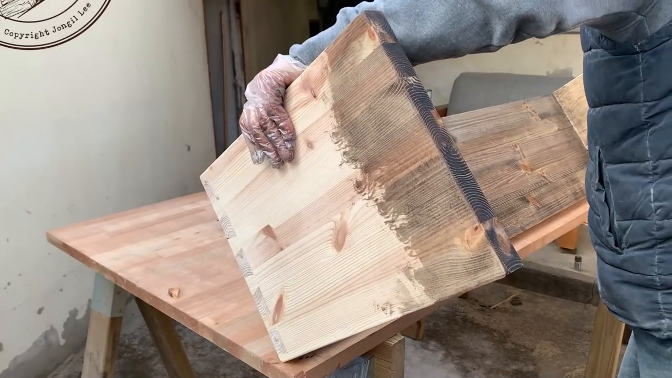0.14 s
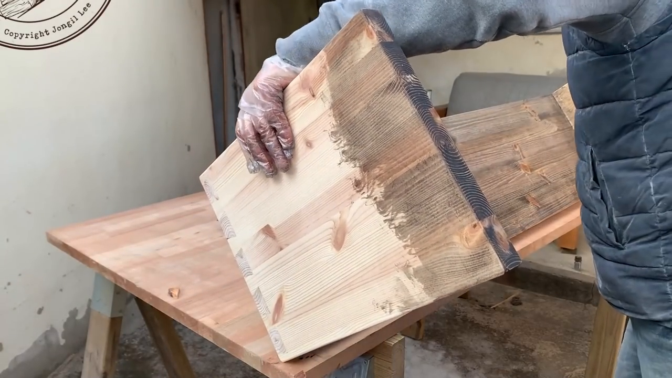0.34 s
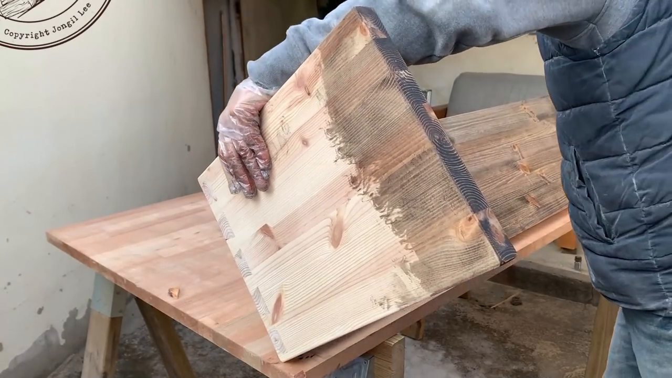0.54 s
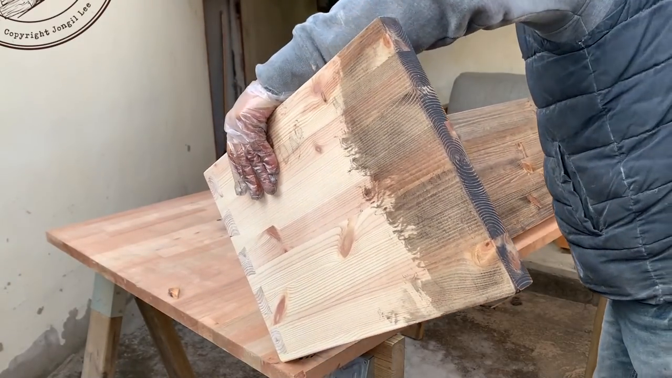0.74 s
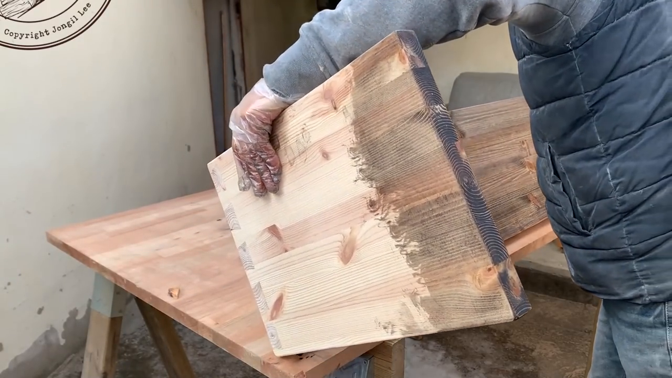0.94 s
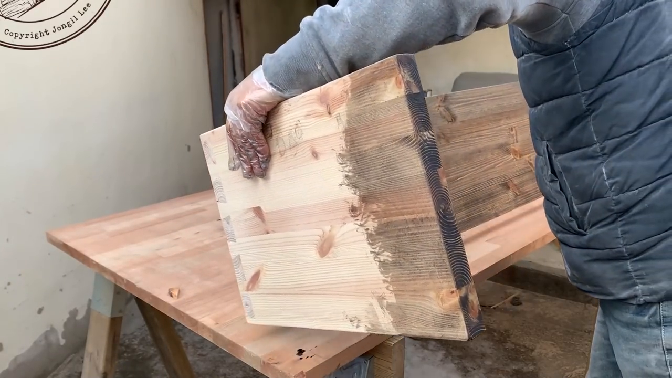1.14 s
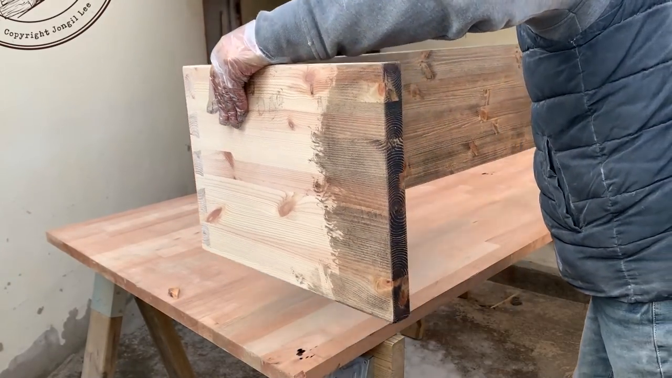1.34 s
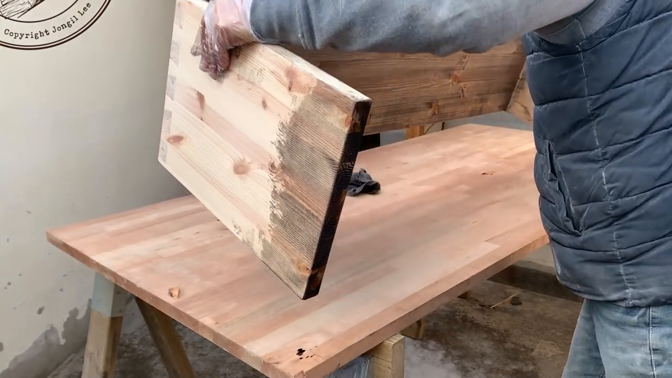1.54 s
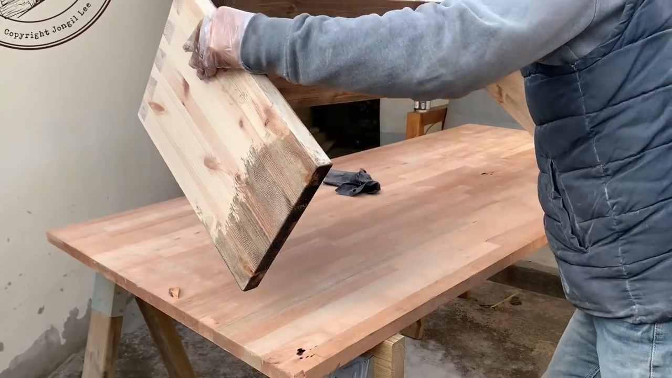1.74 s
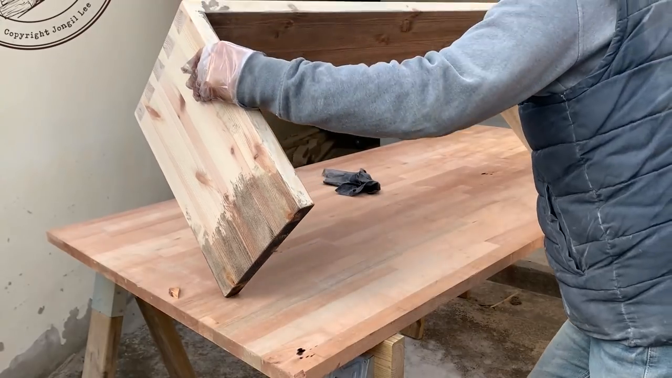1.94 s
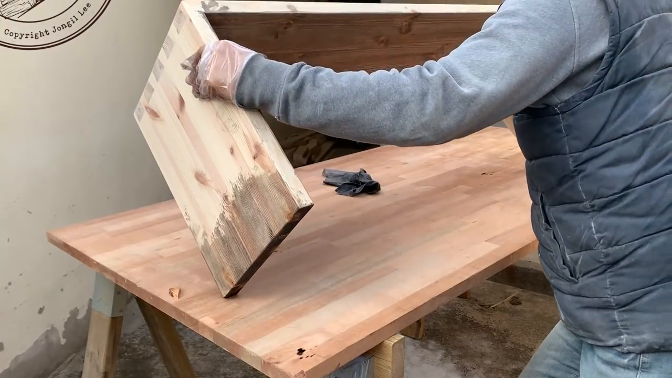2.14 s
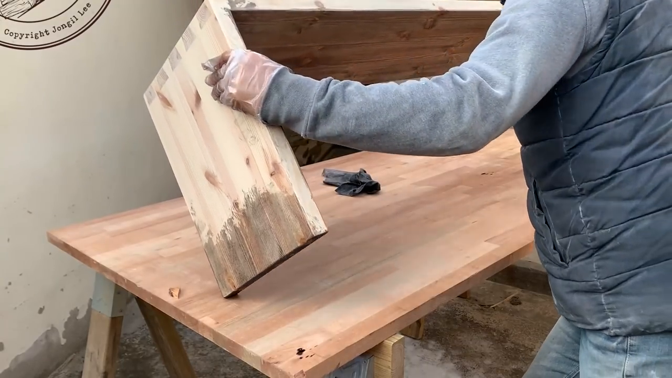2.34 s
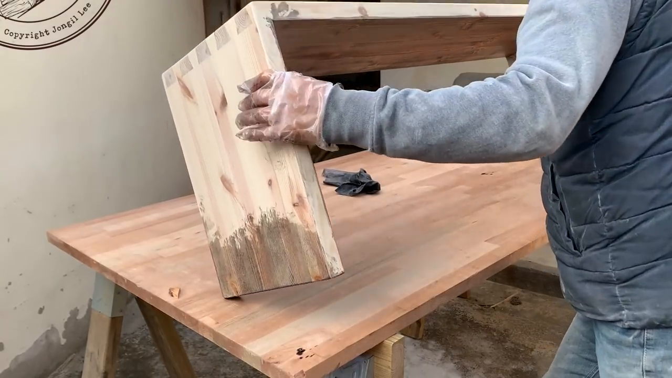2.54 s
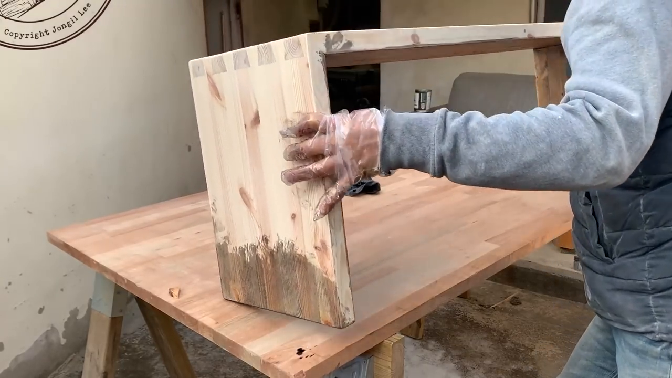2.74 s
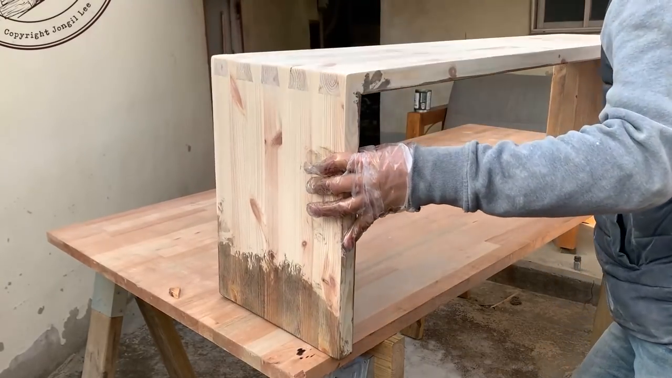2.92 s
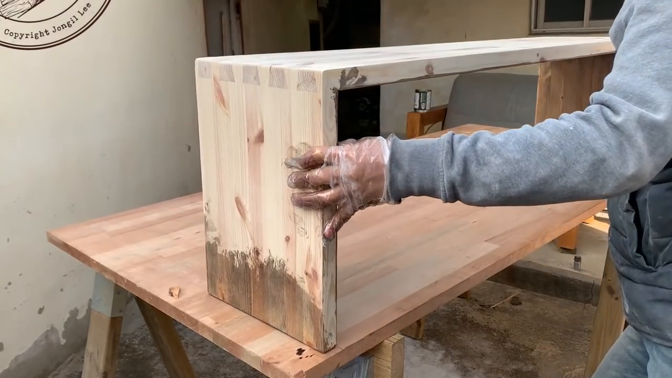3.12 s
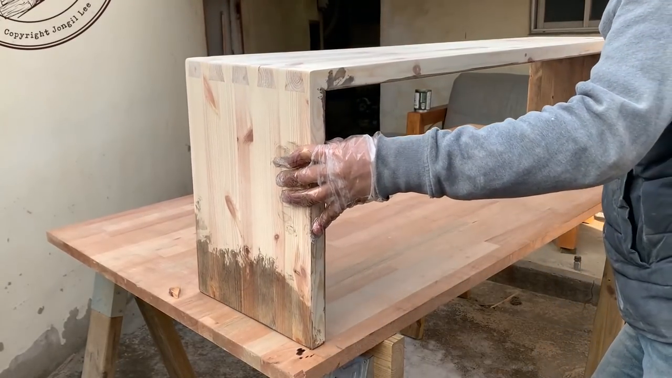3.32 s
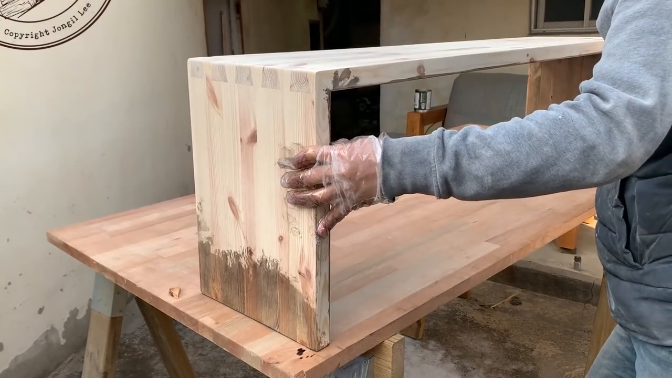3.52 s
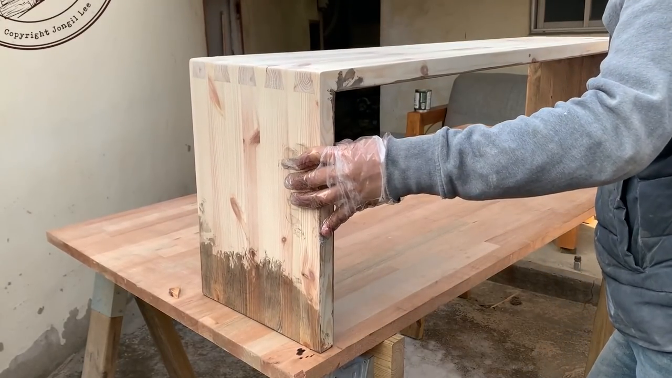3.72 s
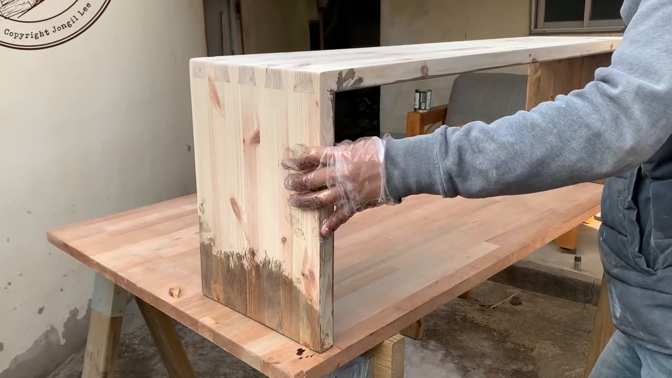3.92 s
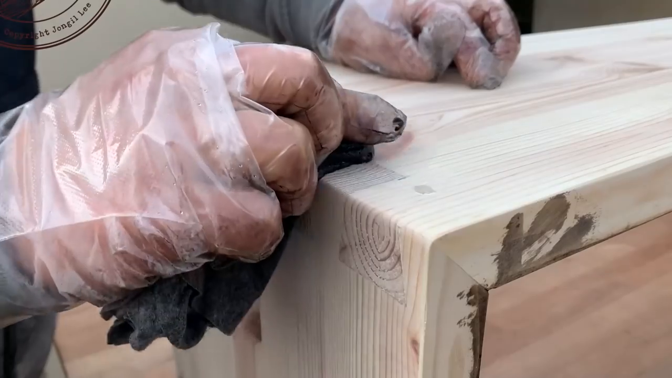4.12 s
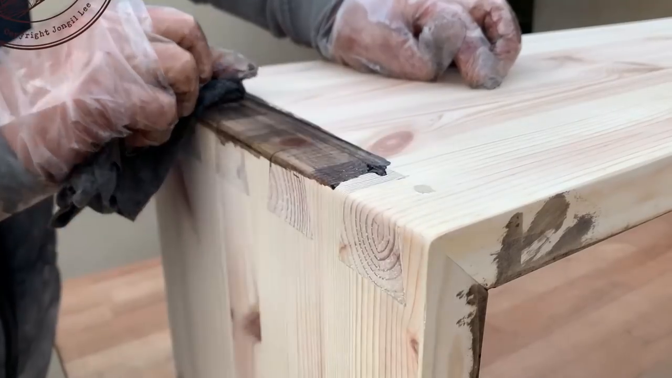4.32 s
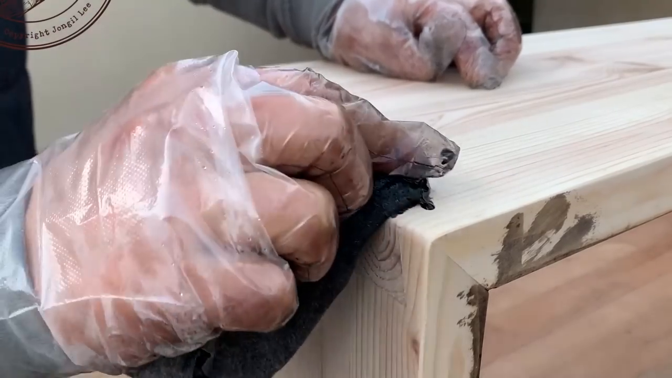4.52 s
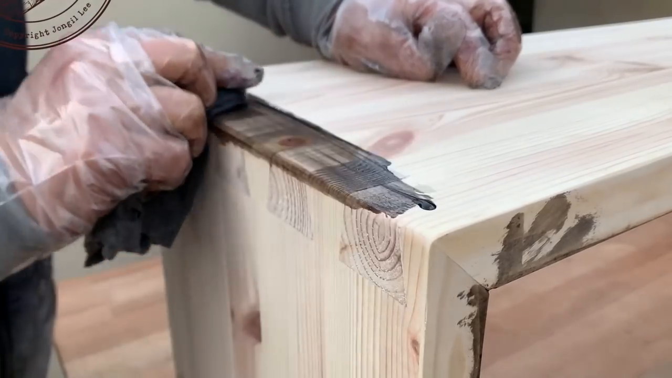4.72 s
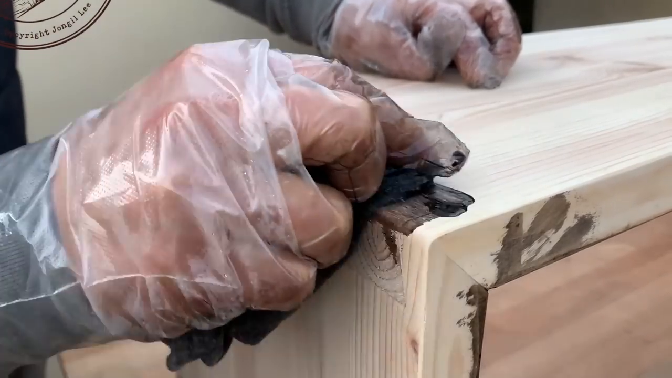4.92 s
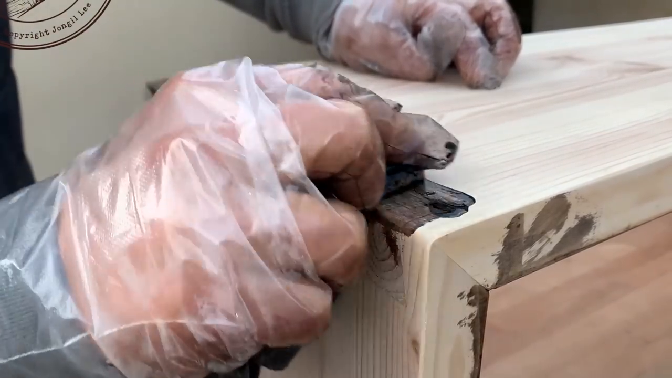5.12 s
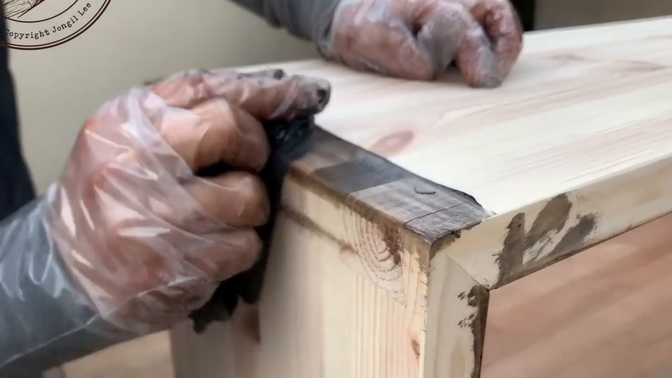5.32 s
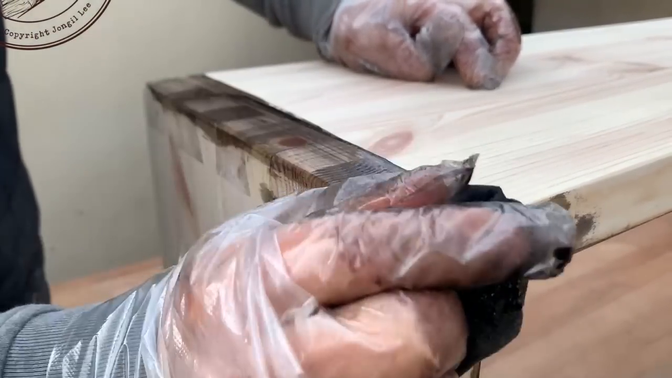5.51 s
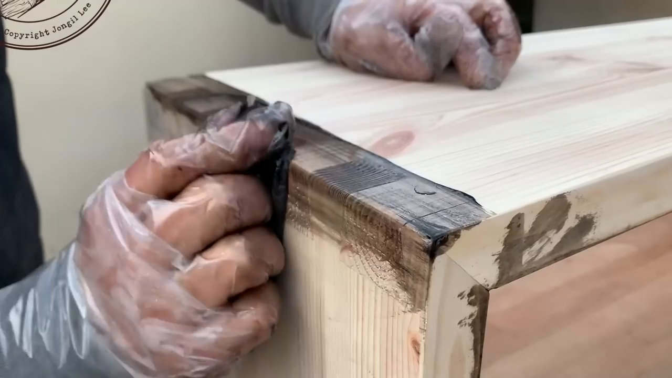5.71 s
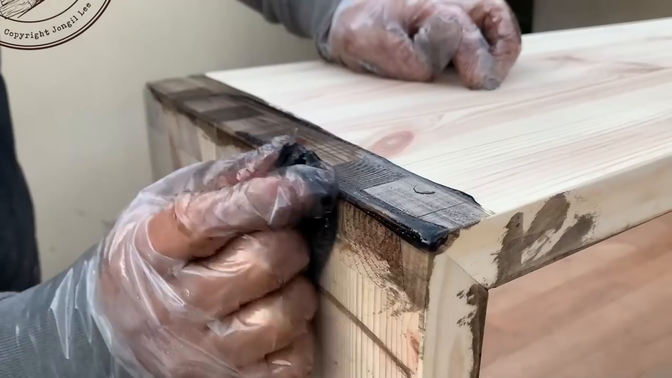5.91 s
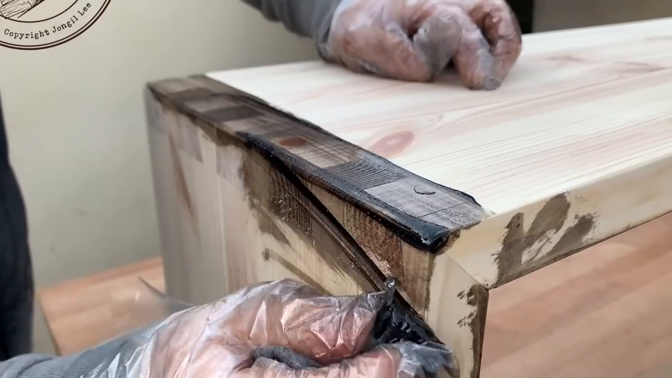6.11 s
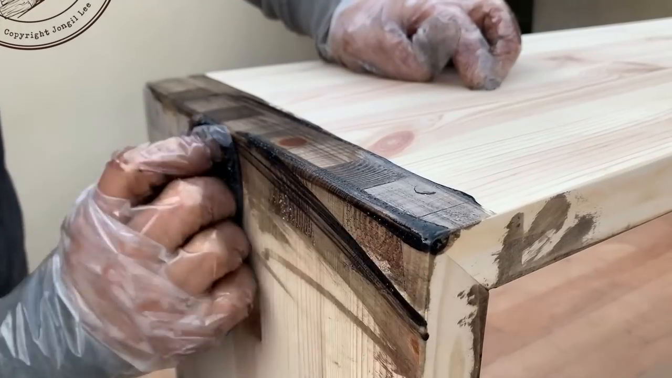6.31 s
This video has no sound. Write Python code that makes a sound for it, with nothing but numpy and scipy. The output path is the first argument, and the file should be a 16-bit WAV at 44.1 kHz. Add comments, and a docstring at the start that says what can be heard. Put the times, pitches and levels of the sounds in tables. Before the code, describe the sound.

Soft rustling and two juddering wooden thuds, followed by close, scratchy cloth strokes on wood with crinkling plastic gloves and small squelches.

```python
"""Staining a pine frame

A pine frame is turned on a trestle table: sleeves and gloves rustle, and its edge lands and judders
twice, shaking the wood and setting something small ringing. A joint squeaks. Then, from close by,
a cloth pad rubs stain along the board in short strokes, catching, slipping and squelching.
Thin plastic gloves crackle as their creases flip. A low rumble fills the workshop."""
import sys
import numpy as np
from scipy import signal
from scipy.fft import rfft, irfft, next_fast_len
from scipy.io import wavfile
from scipy.ndimage import map_coordinates

SR = 44100
rng = np.random.default_rng(int(sys.argv[2]) if len(sys.argv) > 2 else 0)


def wav_record(signal):
    """Record a signal, one row per channel, as 16-bit PCM in the file named by sys.argv[1]."""
    frames = np.transpose(np.atleast_2d(signal))
    bounded = np.clip(frames, -1, 1)
    # unit amplitude maps onto the largest positive 16-bit level
    quanta = np.round(bounded * 32767).astype(np.int16)
    wavfile.write(sys.argv[1], SR, quanta)


N = 284886
TIME = np.arange(N) / SR
COARSE_TIME = np.arange(0, N / SR + .001, .001)  # seconds, one step every millisecond
CLOSE_S = 4.148  # from here on the work is heard close by

# The four tone colours of rubbing cloth, from low to high: f/Hz, level/dB
RASP = [(150, -30), (250, -2), (312, -6.5), (381, -5.5), (506, 1), (689, -1.5), (1220, 2), (4800, -7),
        (6240, -25.5), (10600, -120)]
HISS = [(800, -120), (2600, -2), (4000, -7), (5500, 2), (7000, 4.5), (9000, -17), (11000, -16),
        (14000, -45), (20000, -120)]
SWISH = [(2000, -120), (5000, -30), (6800, -6), (8500, 4), (10000, -6.5), (12500, -25), (20000, -120)]
AIR = [(3000, -120), (7000, -32), (9500, -7.5), (11500, -0.5), (13500, -1), (15000, -8.5), (16000, -5)]

def rubbing(hiss_db, rasp_db, air_db):
    """Cloth catches on wood, making rasp, hiss, swish and airy fizz; the pressure on it flutters."""
    flutter_db = .9 * slips(per_s=90, fall_s=.006) + 1.1 * wobble(150)
    jerk_db = 1.3 * slips(per_s=25, fall_s=.02)  # the cloth lets go in bright jerks
    hiss_db, air_db = hiss_db + jerk_db, air_db + 1.3 * jerk_db
    friction = grit(per_s=500, spread_db=15, grain_db=-8.5)
    hiss = amp(hiss_db - 6.4 + 1.6 * wobble(25)) * coloured(friction, HISS)
    haste_db = .6 * np.maximum(hiss_db + 44, -12)  # fast strokes are brighter
    swish = amp(hiss_db + haste_db - 9.5 + .8 * wobble(20)) * coloured(friction, SWISH)
    rasp = amp(rasp_db + 1.9 * slips(per_s=36, fall_s=0.0065)) * coloured(friction, RASP)
    air = amp(air_db - 0.5 + 1.1 * wobble(27)) * coloured(friction, AIR)
    return amp(flutter_db) * (hiss + swish + rasp + air)

def slips(per_s, fall_s):
    """Sudden rises that ebb away: the cloth sticks and lets go."""
    jumps = (rng.random(N) < per_s / SR) * rng.random(N)
    ebbing = signal.lfilter([1], [1, -np.exp(-1 / (fall_s * SR))], jumps)
    return unit(ebbing - ebbing.mean())

# Sleeves and gloves far off, then pad strokes close by:
# peak t/s, rise/s, fall/s, hiss level/dB, rasp level/dB, air level/dB
RUSTLES = [(0.0, .02, .06, -72, -74, -79), (0.089, .03, .045, -63, -75, -75),
           (0.285, .04, .14, -58.5, -62.5, -64), (0.45, .2, .2, -69, -78, -69),
           (0.63, .2, .05, -67, -74, -72), (0.763, .03, .045, -70, -72, -83),
           (0.839, .025, .04, -70, -66, -95), (0.978, .06, .05, -77, -71, -81),
           (1.203, .008, .04, -84, -75, -93), (1.29, .04, .06, -79, -87, -100),
           (1.44, .02, .06, -84, -82, -102), (1.582, .008, .06, -80, -72, -82),
           (1.71, .008, .1, -80, -75, -88), (1.82, .015, .04, -79, -76, -95),
           (1.98, .01, .03, -63, -78, -74), (2.069, .06, .07, -71, -68, -71),
           (2.241, .04, .05, -82, -80, -84), (2.388, .06, .1, -73, -73, -79),
           (2.56, .11, .3, -61, -69, -66), (2.85, .3, .06, -62, -65, -65), (3.04, .14, .14, -60, -64, -62),
           (3.36, .16, .07, -76, -63, -100), (3.515, .01, .05, -72, -70, -80),
           (3.56, .01, .05, -65, -62, -69), (3.665, .015, .02, -76, -73, -90),
           (3.71, .008, .03, -72, -68, -76), (3.75, .008, .035, -68, -70, -77),
           (3.822, .02, .035, -78, -75, -86), (3.96, .015, .035, -75, -66, -88),
           (4.027, .02, .02, -70, -66, -84), (4.093, .02, .06, -67, -60, -66)]
STROKES = [(4.153, .01, .1, -51, -53, -52), (4.226, .04, .1, -50, -51, -49),
           (4.31, .09, .07, -45, -58, -44), (4.419, .06, .5, -50, -58, -52),
           (4.56, .08, .04, -50, -54, -52), (4.685, .12, .035, -47, -62, -46),
           (4.79, .05, .11, -43, -55, -43.5), (4.975, .018, .1, -50, -58, -50),
           (5.025, .06, .05, -45, -62, -44), (5.133, .07, .065, -41.5, -55, -42),
           (5.26, .03, .05, -50, -52, -47), (5.342, .11, .05, -43, -54, -46),
           (5.435, .035, .25, -43, -53, -42.5), (5.56, .06, .04, -48, -50, -56),
           (5.661, .12, .045, -46, -54, -48), (5.766, .055, .09, -43, -51, -46),
           (5.85, .03, .03, -50, -49, -50), (5.897, .03, .04, -49, -53, -47),
           (5.97, .06, .1, -50, -49, -46), (6.125, .13, .018, -36.5, -56, -44),
           (6.196, .02, .13, -40.5, -51, -39), (6.395, .065, .1, -38.5, -53, -39)]

def movement():
    """Each hand movement swells and fades; gives the levels of hiss, rasp and air in dB."""
    slope_db = column((10.1, 8.5, 14.5))  # how far each layer moves in one rise or fall time

    def power(moves, rest_db):
        total = amp(column(rest_db)) ** 2
        for peak, rise, fall, *db in moves:
            away = np.maximum((peak - COARSE_TIME) / rise, (COARSE_TIME - peak) / fall)
            total = total + amp(column(db) - slope_db * away) ** 2
        return total

    scrape = amp(column((-36, -30, -43))) * judder()[2]  # the sliding edge follows the knock
    far = power(RUSTLES, rest_db=(-96, -83, -107)) + scrape ** 2
    near = power(STROKES, rest_db=(-63, -56, -68))
    return per_sample(10 * np.log10(np.where(COARSE_TIME < CLOSE_S, far, near)))

# Wet pops under the pad: t/s, level/dB, f/Hz
SQUELCHES = [(4.215, -26, 2150), (4.425, -33.5, 1180), (4.683, -39, 1860), (4.757, -35, 1730),
             (4.787, -35.5, 1790), (4.889, -39, 1900), (4.947, -39, 1120), (5.087, -35, 2120),
             (5.242, -33.5, 1820), (5.26, -32.5, 1490), (5.324, -38, 1300), (5.395, -37, 1320),
             (5.43, -37, 1070), (5.469, -44, 1570), (5.704, -33, 1070), (5.848, -39, 1670),
             (5.897, -30, 2230), (6.019, -31, 1630), (6.036, -32, 2270), (6.092, -29.5, 896),
             (6.362, -41, 1710), (6.382, -33, 920)]

def squelches():
    """Stain squeezed out of the cloth makes short pops of unsteady pitch."""
    out, t = np.zeros(N + SR), np.arange(600) / SR
    for start, db, hz in SQUELCHES:
        drift = np.cumsum(rng.standard_normal(len(t))) / 8
        pop = np.sin(2 * np.pi * hz * t + drift) * (1 - np.exp(-t / 0.00046))
        out[round(start * SR):][:len(t)] += amp(db - 0.5 - 60 * t / 0.014) * pop
    return out[:N]

# Hard hits of the frame's edge: t/s, relative level/dB, extra level for the boom/dB
BLOWS = [(0.963, -48, -16), (1.986, -23, 21), (2.033, -34, -6), (2.059, -29, -6), (2.098, -38, -37),
         (2.904, 0.5, -11), (2.935, -9, -17), (2.952, -29, -14), (3.035, -29, -14), (3.074, -19, -6),
         (3.558, -52, -15), (6.091, -32, -24)]
# Notes the table and frame ring at, in four groups from low to high: f/Hz, width/Hz, level/dB
TABLE = [(91, 16, -0.27), (108, 18, -1.8)]
BOOM = [(173, 58, -2), (221.6, 77, -0.5), (249, 50, -2), (351, 30, -1.5)]
KNOCK = [(474.5, 51, -7.5), (594, 60, -3.5), (650, 98, -2), (764, 150, -5.5), (920, 107, -4),
         (1028, 110, -4), (1209, 170, -7)]
EDGE = [(1296, 200, -6.5), (1640, 290, -2.5), (1960, 100, -3.5), (2103, 100, -2), (2690, 1000, -8.5),
        (3340, 160, -4), (4000, 1000, -15.5), (5250, 950, -31)]

def frame():
    """The frame's edge hits the table and chatters on it, making the wood ring."""
    def wood_tone(f, notes):
        lowest, highest = notes[0][0], notes[-1][0]
        return resonances(f, notes) * low_cut(f, .52 * lowest) * high_cut(f, .96 * highest) ** 2

    def blow_tone(f):
        return (resonances(f, KNOCK) - amp(-4) * resonances(f, EDGE)) * high_cut(f, 5500) ** 3

    blows, thumps = np.zeros((2, N))
    for start, db, boom_db in BLOWS:
        blows[round(start * SR)] = amp(db + 17.5)
        thumps[round(start * SR)] = amp(db + boom_db + 13)
    out = filtered(blows, blow_tone) + filtered(thumps, lambda f: wood_tone(f, BOOM))
    chatter = grit(per_s=150, spread_db=9, grain_db=-1)
    chatter = filtered(chatter, lambda f: high_cut(f, 2500) ** 2)  # wood on wood is a slow contact
    for gain, notes in zip(per_sample(judder()), (TABLE, BOOM, KNOCK, EDGE)):
        ring = filtered(chatter, lambda f: wood_tone(f, notes))
        out += amp(-2.5) * gain * unit(ring)
    return out

# Bursts of the frame juddering: t/s, hold/s, then level/dB for each of table, boom, knock and edge
JUDDERS = [(0.955, .045, -68, -60, -70, -74), (1.981, .03, -42, -32.5, -35, -52),
           (2.035, .045, -42, -30, -34, -50), (2.902, .07, -35, -34, -25, -32),
           (2.995, .045, -41, -33, -29, -41), (3.05, .025, -45, -29, -26.5, -38),
           (3.11, .045, -48, -41, -35, -51), (3.47, .03, -57, -62, -61, -78),
           (3.556, .012, -54, -52, -61, -62), (3.69, .11, -58, -70, -65, -74),
           (4.417, .02, -70, -58, -51, -58), (6.088, .012, -54, -54, -42.5, -46),
           (6.378, .014, -60, -56, -46, -50)]

def judder():
    """Each burst of shaking rises, holds and dies away; gives gains for table, boom, knock and edge."""
    rise_s, fall_db_per_s = column((.02, .015, .006, .003)), column((95, 235, 240, 280))
    power = 0
    for start, hold, *db in JUDDERS:
        t = COARSE_TIME - start
        fade_db = fall_db_per_s * np.maximum(t - rise_s - hold, 0)
        power += (np.clip(t / rise_s, 0, 1) * amp(column(db) - fade_db)) ** 2
    return np.sqrt(power)

# Single snaps of the gloves: t/s, level/dB, f/Hz
SNAPS = [(0.3589, -43, 6500), (0.3656, -39, 7700), (0.5995, -41, 9900), (0.6452, -46, 3900),
         (0.677, -44, 10300), (0.7505, -42, 7100), (0.831, -45, 4000), (0.9175, -53, 3100),
         (0.9707, -44, 5300), (1.1236, -62, 3200), (1.199, -47, 6200), (1.2236, -56, 7500),
         (1.2344, -56, 4600), (1.2546, -55, 8400), (1.2878, -56, 5800), (1.379, -50, 7400),
         (1.4612, -58, 3700), (1.5827, -43, 5900), (1.7668, -49, 6700), (1.8147, -55, 4300),
         (2.3401, -48, 8400), (2.3767, -36, 7100), (2.6044, -43, 4000), (2.6715, -43, 3400),
         (2.8186, -43, 6700), (2.8494, -44, 4500), (2.8673, -36, 7200), (3.7084, -53, 2600),
         (3.7487, -53, 3600), (4.0723, -45, 5800), (4.0948, -43, 4800), (4.1502, -30, 4500),
         (4.216, -20, 2600), (4.2299, -27, 4200), (4.2429, -19, 8000), (4.2562, -25, 5600),
         (4.2667, -22, 5600), (4.3703, -34, 4300), (4.5359, -30, 8000), (4.5439, -29, 6600),
         (4.5782, -31, 4100), (4.63, -32, 8700), (4.7332, -34, 4100), (4.7591, -27, 3600),
         (4.8057, -25, 8300), (4.8906, -22, 2900), (4.9479, -28, 5300), (5.031, -20, 10400),
         (5.0543, -29, 4800), (5.0871, -28, 7200), (5.09, -26, 4700), (5.1688, -19, 5500),
         (5.1923, -24, 7400), (5.2271, -29, 6600), (5.2427, -21, 8300), (5.3081, -17, 9400),
         (5.3098, -15, 8800), (5.3249, -20, 5400), (5.4046, -30, 5400), (5.4701, -26, 4600),
         (5.4973, -27, 7500), (5.5233, -25, 6500), (5.5274, -20, 4700), (5.5787, -26, 4400),
         (5.6933, -28, 6700), (5.7299, -24, 6600), (5.8262, -28, 8100), (5.8496, -26, 5000),
         (5.8553, -22, 6200), (5.8763, -29, 6300), (5.8956, -18, 3900), (5.898, -19, 6200),
         (5.9018, -20, 4800), (5.9621, -18.5, 6900), (5.9839, -23, 5300), (6.0132, -25, 4000),
         (6.021, -26, 7900), (6.0242, -14.5, 6100), (6.0475, -23, 6300), (6.0757, -24, 7800),
         (6.148, -21, 4300), (6.1741, -27, 5800), (6.1865, -23, 4500), (6.1909, -18, 9800),
         (6.3119, -22, 8700), (6.3647, -24, 6200)]

def gloves(effort_db):
    """Plastic gloves snap, over a crackle whose loudness follows the hand's effort."""
    out = np.zeros(N + SR)
    for peak_s, db, hz in SNAPS:
        crease(out, peak_s, db, hz, rise_s=.5684 / hz, noisy=1.0)
    for when, pitch, size in rng.random((800, 3)):
        db = effort_db[int(when * N)] + 7 + 9.5 * size ** 2
        crease(out, when * N / SR, db, hz=2500 * 4 ** pitch, rise_s=.000119, noisy=0.4)
    return filtered(out[:N], lambda f: low_cut(f, 900) ** 2)  # a small film gives off no bass

def crease(out, peak_s, db, hz, rise_s, noisy):
    """A crease of thin plastic flips: adds a click to out, then the film rustles on briefly."""
    t = np.arange(500) / SR
    pole = 0.95 * np.exp(2j * np.pi * hz / SR)  # tunes the noise to the click's pitch
    tuning = np.poly([pole, np.conj(pole)]).real
    fizz = unit(signal.lfilter([1, -1], tuning, rng.standard_normal(len(t))))
    click = (np.sin(2 * np.pi * hz * t) + noisy * fizz) * t * np.exp(-t / rise_s)
    rustle = amp(-23.5 - 60 * t / 0.013) * np.minimum(t / rise_s, 1) * fizz
    start = max(round((peak_s - rise_s) * SR), 0)
    out[start:][:len(t)] += amp(db) * (click / np.abs(click).max() + rustle)

# Pulses of the squeak: peak t/s, f/Hz, level/dB, half length/s
SQUEAKS = [(3.827, 1510, -67.5, 0.033), (3.882, 1520, -66.5, 0.023), (3.916, 1520, -67.5, 0.0092),
           (3.945, 1490, -66.5, .012), (3.998, 1498, -60, 0.02), (4.029, 1530, -60, 0.021),
           (4.068, 1525, -66, 0.013), (4.108, 1500, -62, 0.012), (4.172, 1460, -48.5, 0.013),
           (4.213, 1452, -52, 0.0085)]

def squeak():
    """A joint squeaks in a thin, rough tone; the early pulses carry a weaker, higher tone too."""
    rough, upper_rough = .9 * wobble(130), 1.3 * wobble(150)
    upper = amp(-12) * (TIME < 3.97) * np.sin(2 * np.pi * 2280 * TIME + upper_rough)
    out = np.zeros(N)
    for peak, hz, db, half in SQUEAKS:
        swell = amp(db) * np.exp(-((TIME - peak) / half) ** 2)
        out += swell * (np.sin(2 * np.pi * hz * TIME + rough) + upper)
    return np.sqrt(2) * out

# Notes of something small and hard on the table: f/Hz, level/dB, fade time/s
RING = [(2800, -65, 1.3), (3130, -66, 1.3), (3270, -64, 1.3), (3760, -62, 1.3)]

def ringing():
    """The second landing shakes a small object, which rings in thin, unsteady tones."""
    t = np.maximum(TIME - 2.92, 0)
    out = np.zeros(N)
    for hz, db, fade_s in RING:
        gain = amp(db - 60 * t / fade_s + 3.5 * wobble(30))
        out += gain * np.sin(2 * np.pi * hz * t + 2.4 * wobble(40))
    return out * np.minimum(t / 0.029, 1)

# The rumble's strength, far off and then close by: t/s, deep level/dB, upper level/dB
RUMBLE = [(0.0, -73, -76), (1.97, -73.5, -78), (2.2, -63, -80), (2.4, -72, -77), (2.8, -71, -69),
          (3.08, -60, -61), (3.51, -62, -64), (3.8, -64, -74), (4.14, -68, -72), (4.15, -61, -60),
          (4.3, -59, -55.5), (4.7, -58.5, -57.5), (5.16, -59, -61), (5.6, -57, -59),
          (6.46, -60.5, -55.5)]
# Tone colours of the deep rumble, the upper rumble and the faint hiss: f/Hz, level/dB
DEEP = [(15, -46), (28, -23), (40, -2.5), (55, 2.5), (90, -0.5), (120, -14), (170, -34), (500, -120)]
UPPER = [(80, -17), (130, 2), (170, -2), (260, -8), (400, -7.5), (600, -39), (1500, -120)]
FAINT_HISS = [(30, -120), (90, -38), (150, -3), (550, 3.5), (900, 5), (2750, -23), (6400, -48.5),
              (11000, -46), (16000, -63.5)]

def workshop():
    """The workshop rumbles unevenly over a faint, steady hiss."""
    times, *levels = np.transpose(RUMBLE)
    deep_db, upper_db = (np.interp(TIME, times, db) for db in levels)
    deep = unit(amp(2.56 * wobble(7)) * coloured(rng.standard_normal(N), DEEP))
    upper = unit(amp(2.9 * wobble(24)) * coloured(rng.standard_normal(N), UPPER))
    hiss = coloured(rng.standard_normal(N), FAINT_HISS)
    return amp(deep_db + 2.5) * deep + amp(upper_db) * upper + amp(-81) * hiss

# How long the room's echo lasts: f/Hz, fade time/s
ECHO_TIMES = [(100, 0.5), (500, .35), (3000, 0.19), (10000, 0.15)]

def room(x):
    """The workshop's echo comes a moment late, and its high notes die first."""
    hz, t, noise = signal.stft(rng.standard_normal(SR // 2), SR, nperseg=256)
    fade = amp(-60 * t / along(ECHO_TIMES, hz)[:, None])
    tail = signal.istft(noise * fade, SR, nperseg=256)[1]
    return signal.fftconvolve(np.pad(x, (400, 0)), tail / np.linalg.norm(tail))[:N]

def amp(db):
    """Turn decibels into a gain."""
    return 10 ** (np.asarray(db) / 20)

def unit(x):
    """Scale x to an average power of 1."""
    return x / np.sqrt(np.mean(x ** 2) + 1e-20)

def along(points, hz):
    """Read between (f/Hz, value) points on a log scale."""
    f, values = np.transpose(points)
    return np.interp(np.log(hz + 1), np.log(f + 1), values)

def wobble(per_s):
    """A smooth curve through per_s random values a second."""
    return map_coordinates(rng.standard_normal(int(N * per_s / SR) + 4), [TIME * per_s])

def grit(per_s, spread_db, grain_db):
    """Noise with scattered tiny clicks of different sizes."""
    clicks = (rng.random(N) < per_s / SR) * amp(spread_db * rng.random(N)) * rng.choice([-1, 1], N)
    return rng.standard_normal(N) + amp(grain_db) * unit(clicks)

def filtered(x, response):
    """Multiply each frequency f in x by response(f)."""
    size = next_fast_len(N + SR // 2)
    return irfft(rfft(x, size) * response(np.fft.rfftfreq(size, 1 / SR)), size)[:N]

def coloured(x, spectrum):
    """Give x a tone colour, at an average power of 1."""
    return unit(filtered(x, lambda hz: amp(along(spectrum, hz))))

def resonances(f, notes):
    """A filter that rings at each note."""
    return sum((-1) ** k * amp(db) * 1j * f * width / (hz * hz - f * f + 1j * f * width)
               for k, (hz, width, db) in enumerate(notes))

def low_cut(f, hz):
    """Soften what lies below hz."""
    return 1j * f / (hz + 1j * f)

def high_cut(f, hz):
    """Soften what lies above hz."""
    return 1 / (1 + 1j * f / hz)

def per_sample(rows):
    """Fill in millisecond curves to one value a sample."""
    return np.array([np.interp(TIME, COARSE_TIME, row) for row in rows])

def column(values):
    """Stack values downwards, one for each layer."""
    return np.reshape(values, (-1, 1))

def scene():
    """Mix everything into one channel; from afar the gloves have more echo."""
    hiss_db, rasp_db, air_db = movement()
    wood, plastic = frame(), gloves(effort_db=hiss_db)
    glove_echo_db = np.where(TIME < CLOSE_S, -7, -15)
    echo = room(amp(-12) * wood + amp(glove_echo_db) * plastic)
    cloth = rubbing(hiss_db, rasp_db, air_db)
    return (cloth + squelches() + wood + plastic + squeak() + ringing() + workshop() + echo)[None]

def record(dry):
    """Remove the very highest treble."""
    return filtered(dry[0], lambda hz: hz < 15900)[None]

dry = scene()
out = record(dry)
wav_record(out)
```